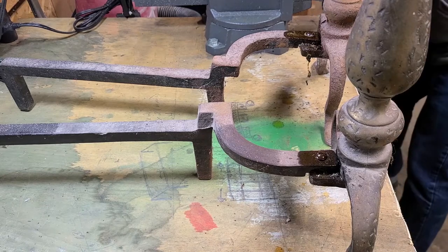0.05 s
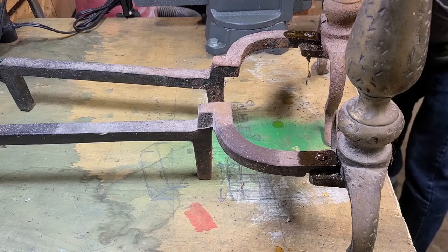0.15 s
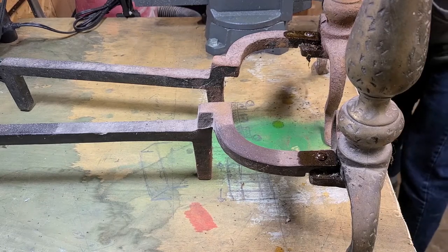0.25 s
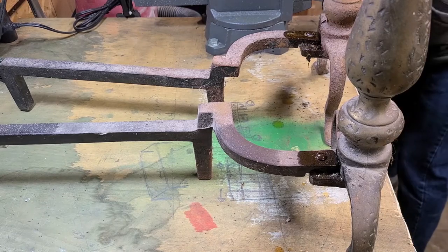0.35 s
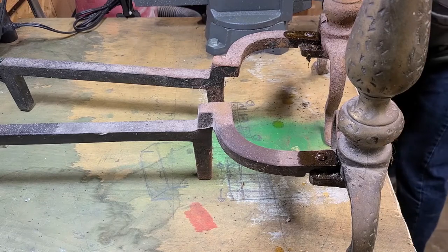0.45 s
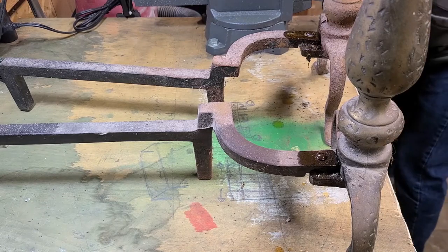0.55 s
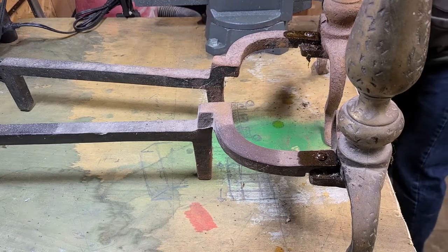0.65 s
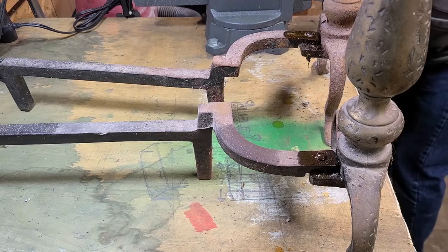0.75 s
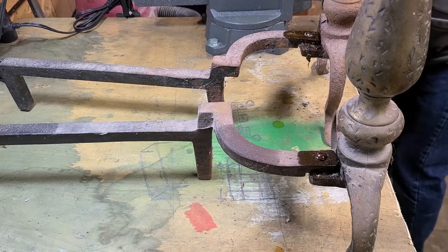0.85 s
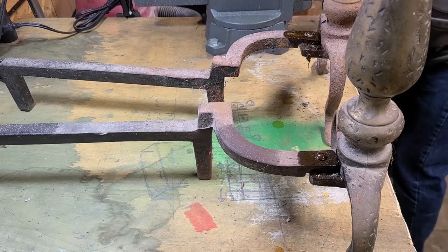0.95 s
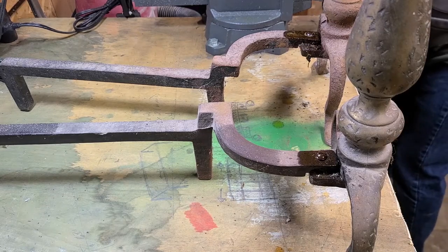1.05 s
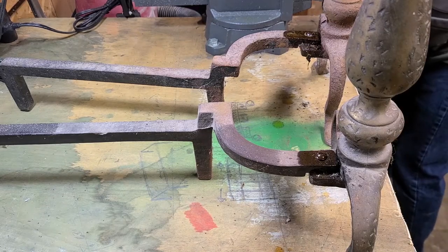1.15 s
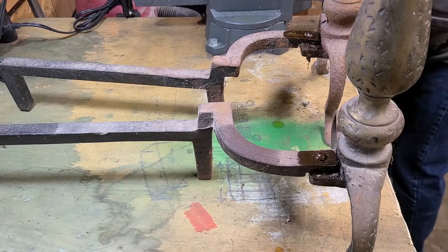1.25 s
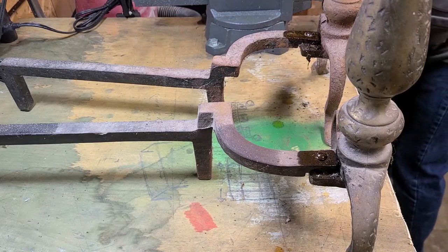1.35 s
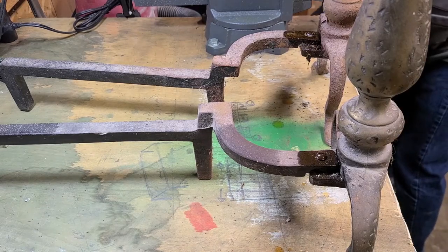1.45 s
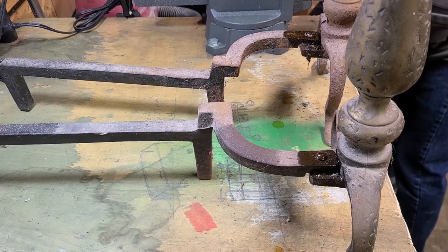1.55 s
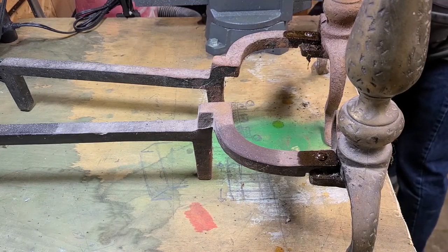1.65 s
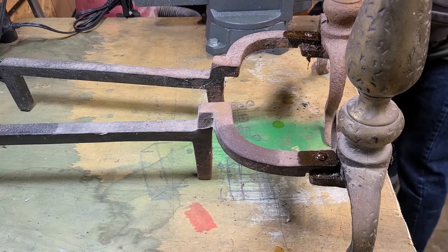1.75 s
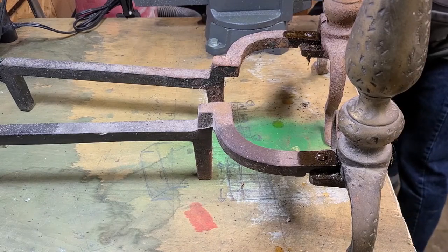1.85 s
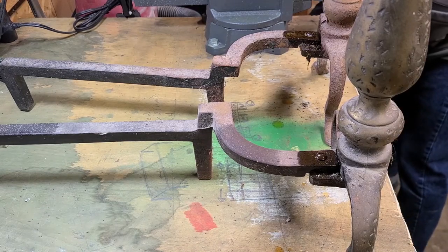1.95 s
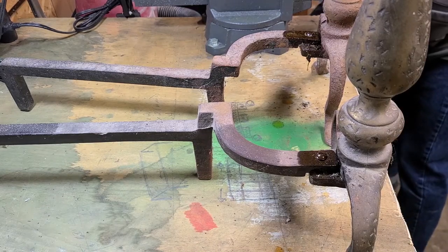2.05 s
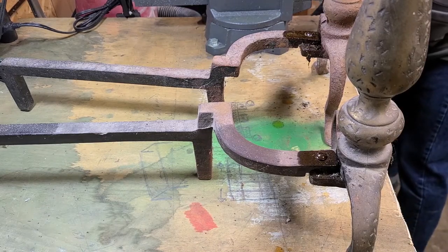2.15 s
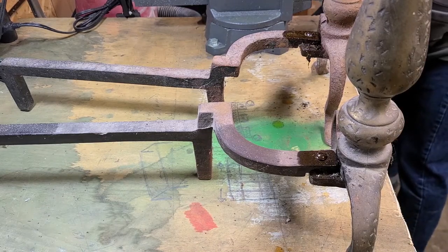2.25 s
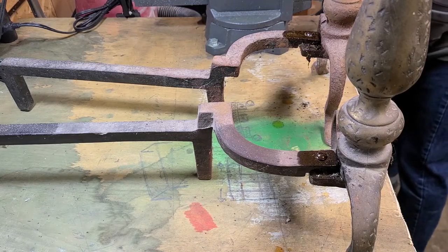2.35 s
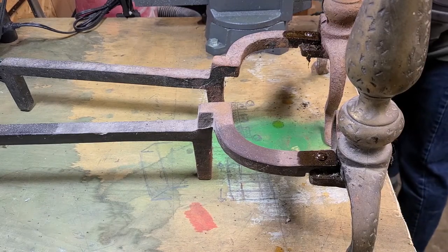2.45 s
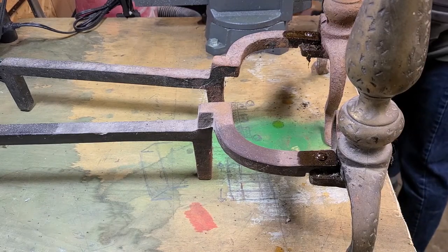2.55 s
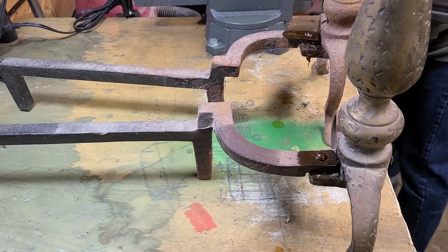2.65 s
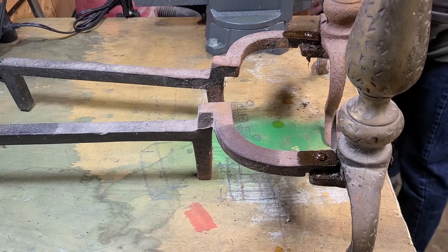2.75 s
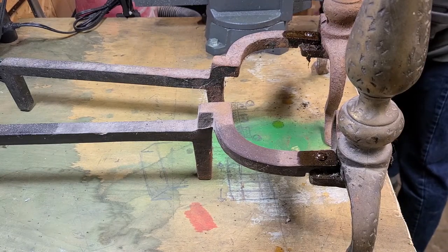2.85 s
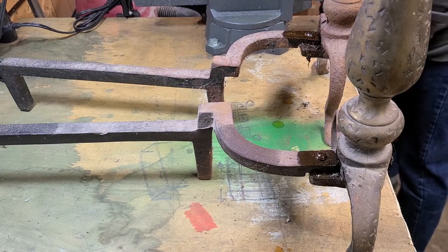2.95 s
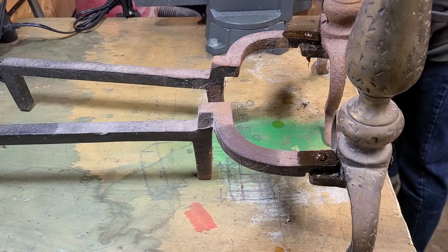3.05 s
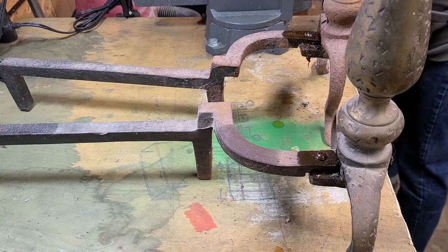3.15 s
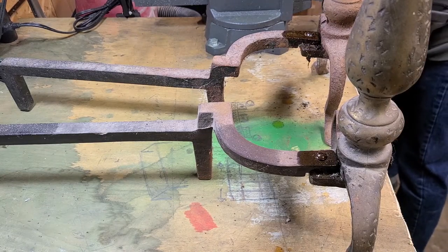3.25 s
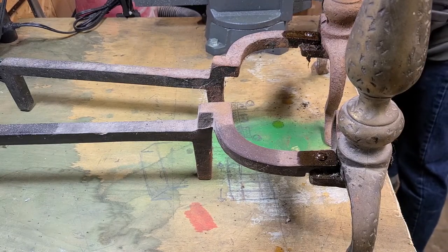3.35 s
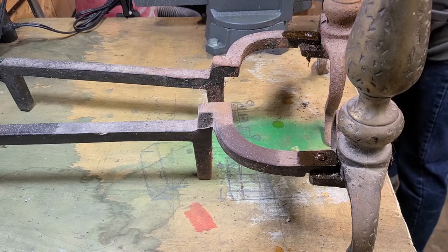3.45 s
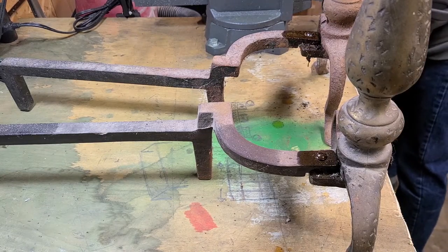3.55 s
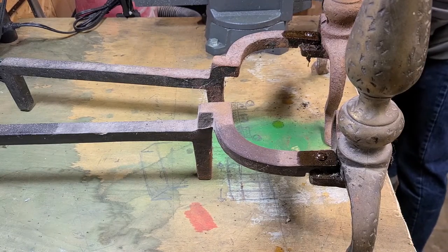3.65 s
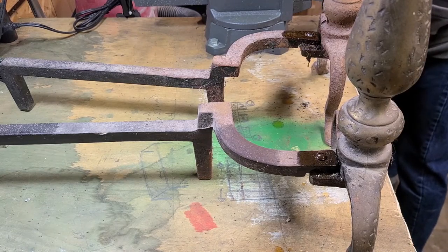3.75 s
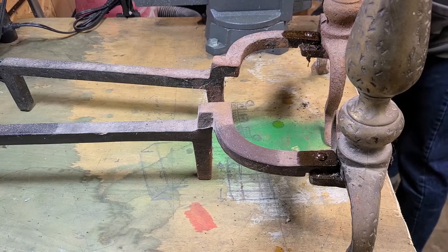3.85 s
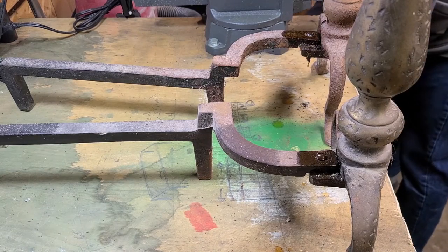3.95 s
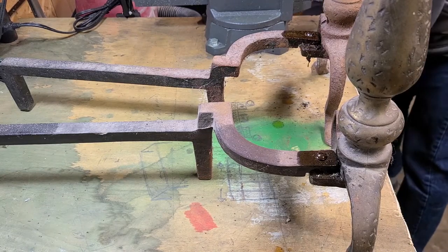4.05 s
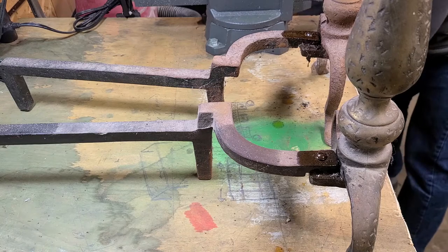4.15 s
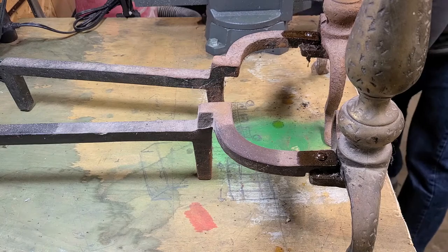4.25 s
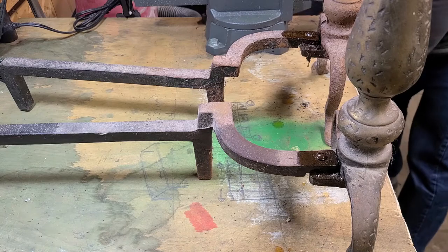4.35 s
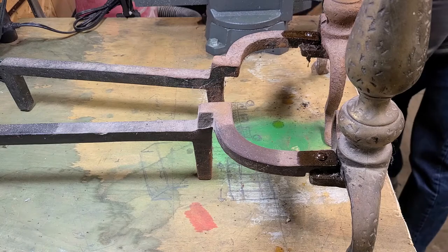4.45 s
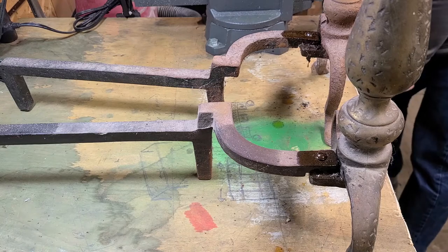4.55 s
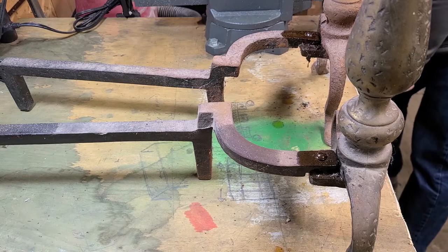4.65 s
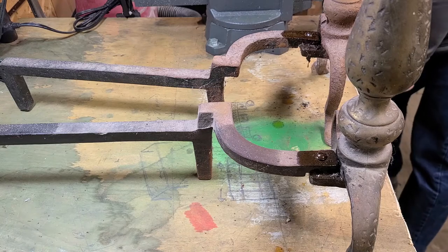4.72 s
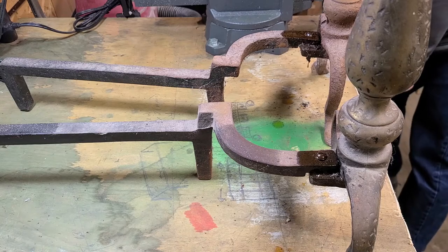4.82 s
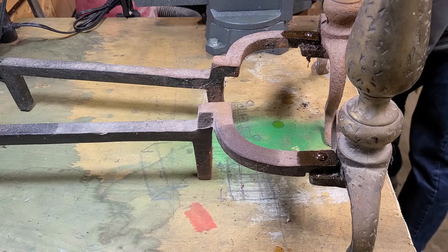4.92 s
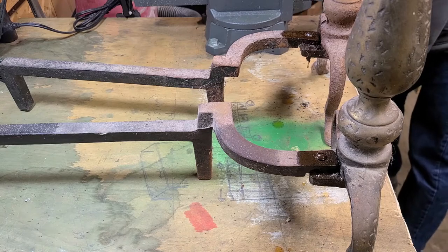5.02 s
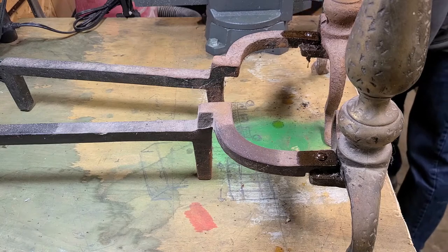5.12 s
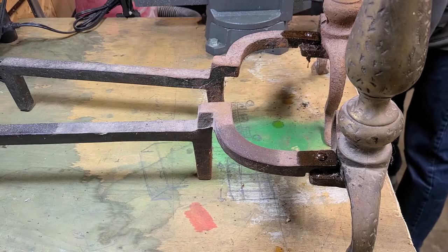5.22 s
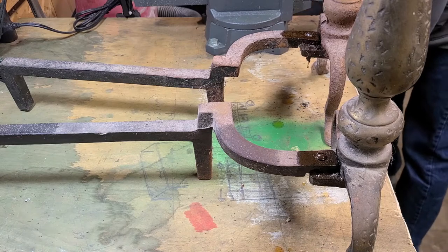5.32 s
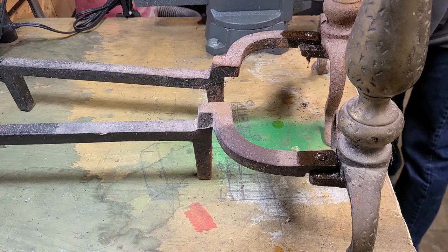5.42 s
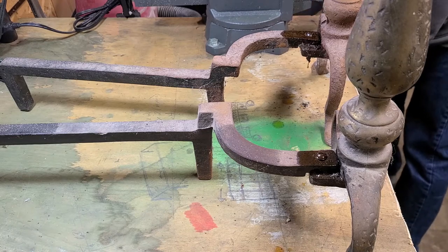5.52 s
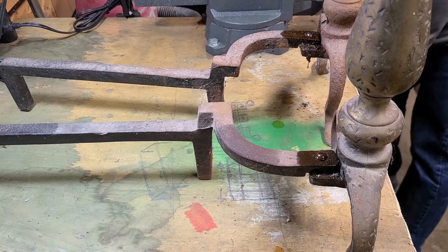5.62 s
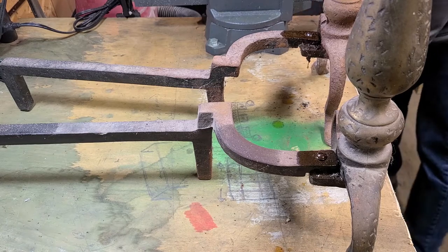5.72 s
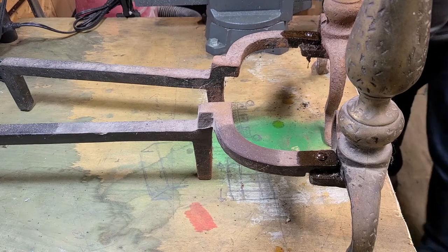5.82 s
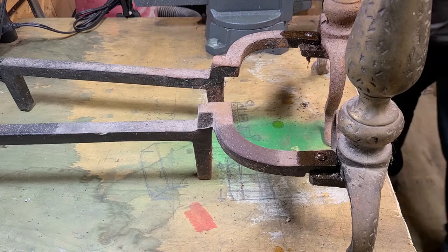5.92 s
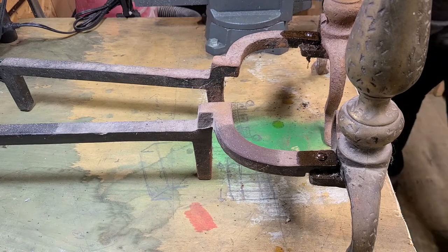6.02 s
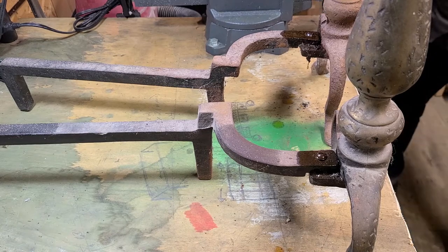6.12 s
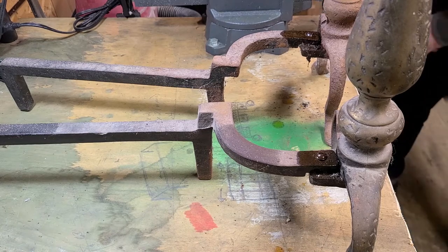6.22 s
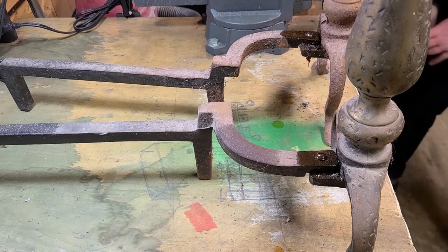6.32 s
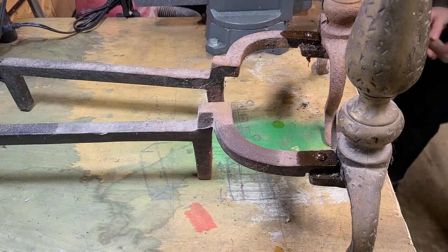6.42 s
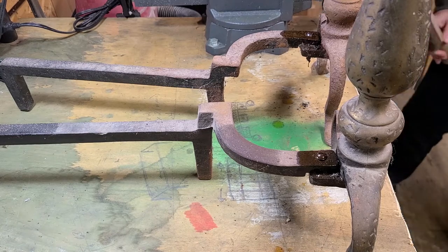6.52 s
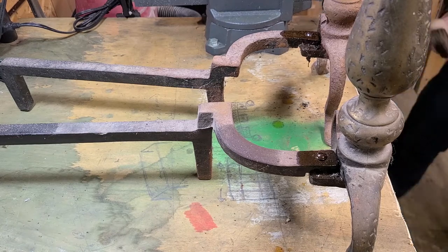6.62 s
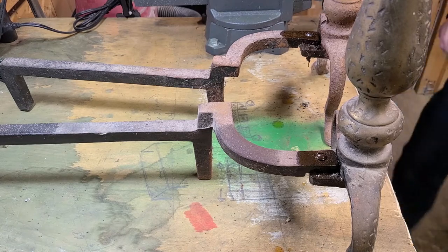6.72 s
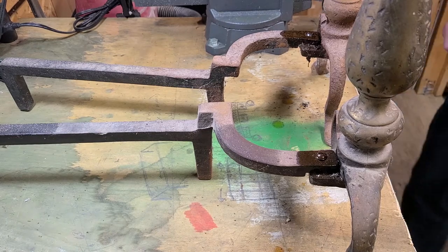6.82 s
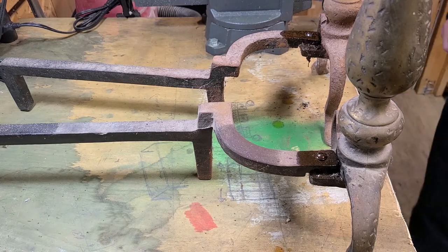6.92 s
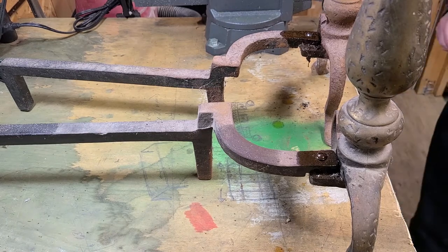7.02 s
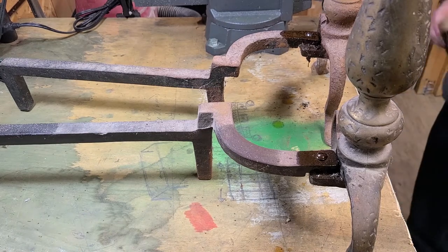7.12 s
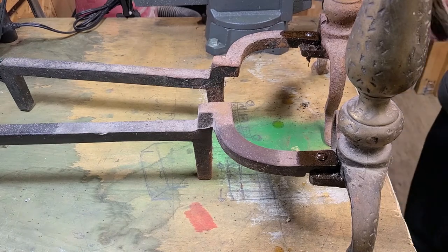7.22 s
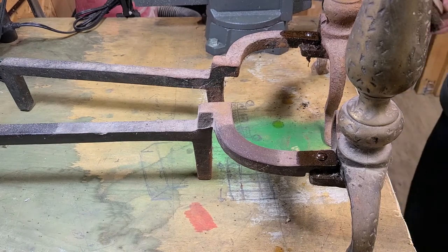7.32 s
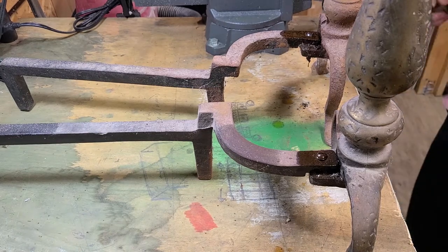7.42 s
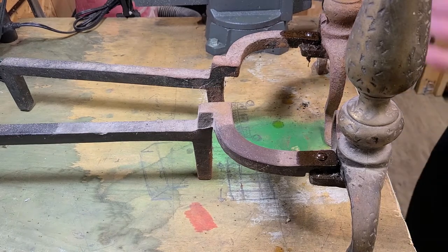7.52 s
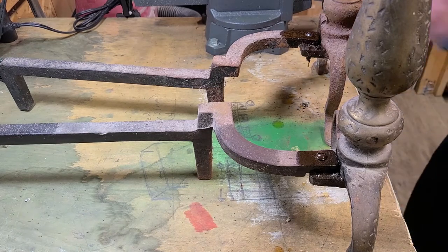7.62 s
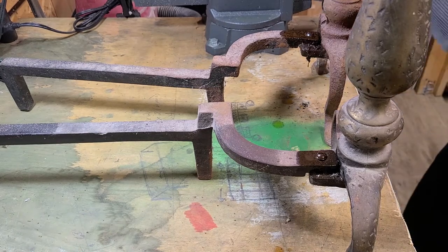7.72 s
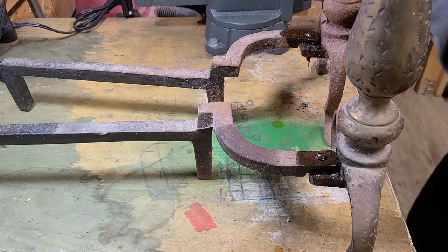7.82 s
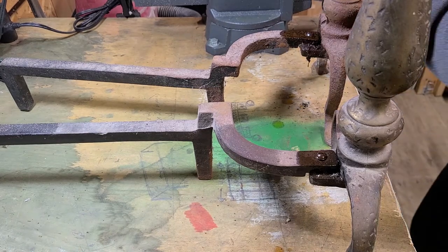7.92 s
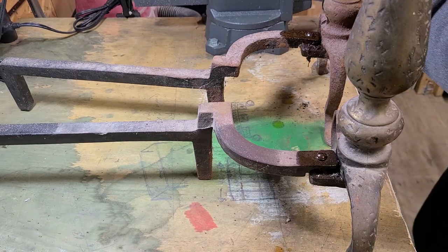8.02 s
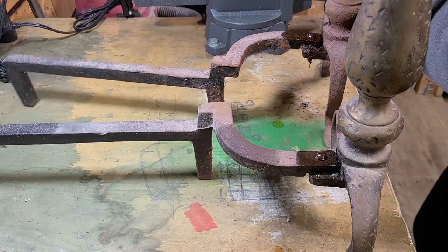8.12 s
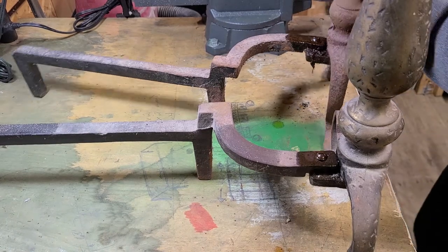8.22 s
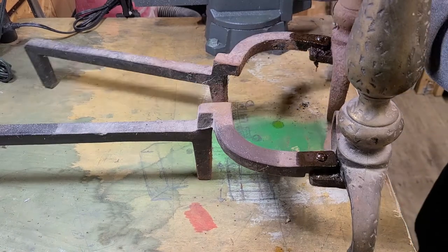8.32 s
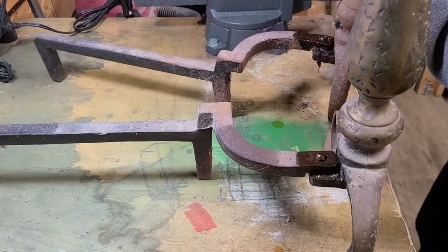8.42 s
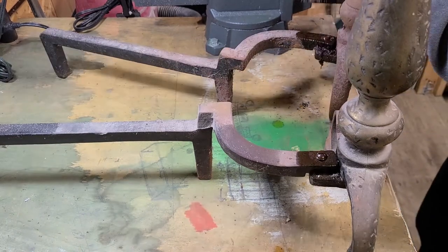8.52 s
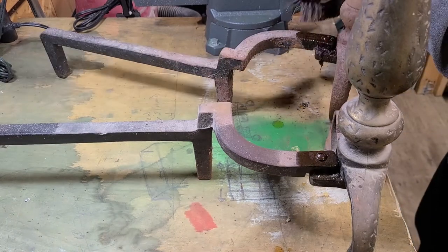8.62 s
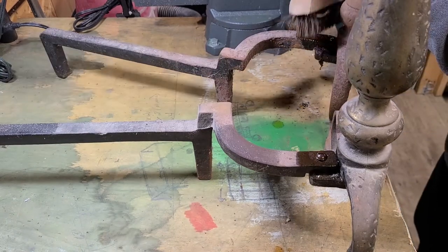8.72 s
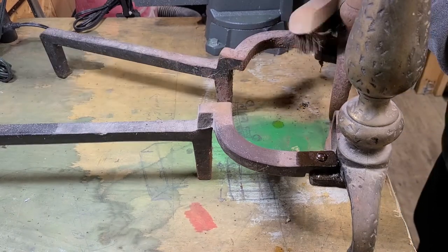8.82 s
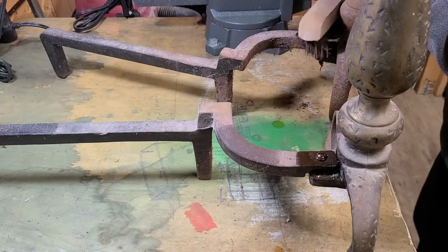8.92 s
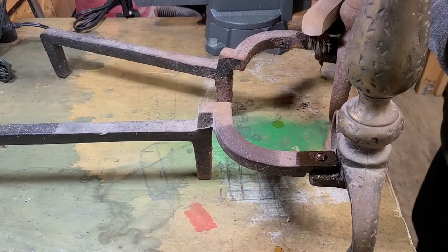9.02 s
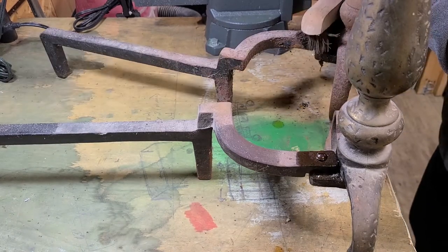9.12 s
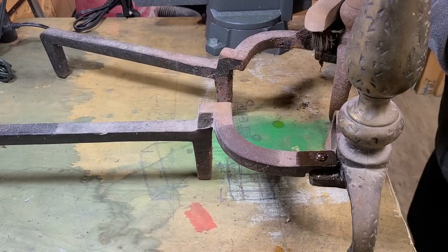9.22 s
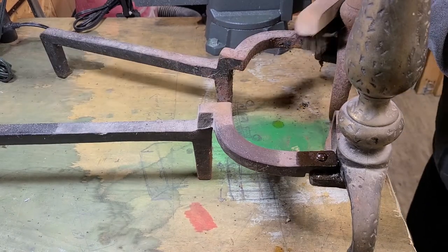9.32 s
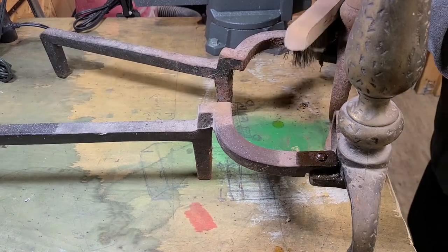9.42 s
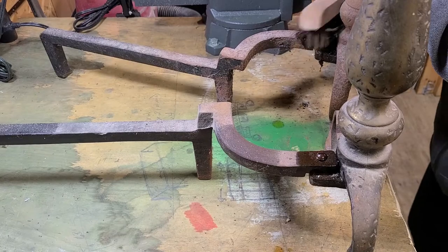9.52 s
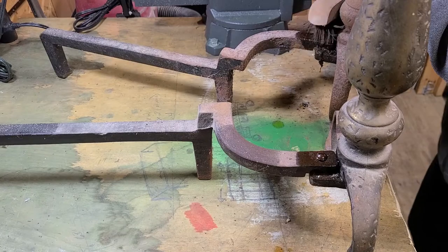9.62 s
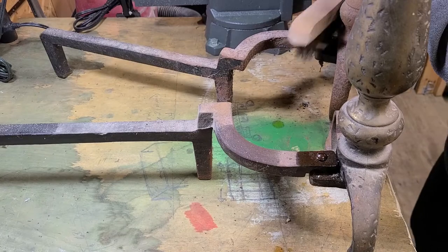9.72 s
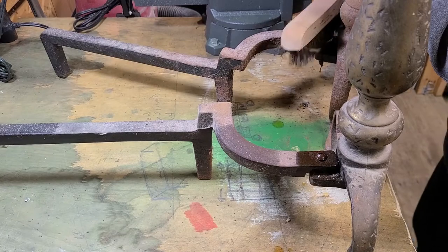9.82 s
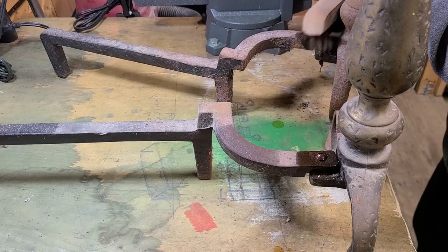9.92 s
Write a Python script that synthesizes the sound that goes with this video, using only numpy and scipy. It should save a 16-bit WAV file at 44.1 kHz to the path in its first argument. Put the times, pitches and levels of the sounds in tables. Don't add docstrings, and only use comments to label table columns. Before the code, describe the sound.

Quiet shuffling, cloth rustle and dull floor thumps, then iron feet chatter over a bench, land with a jolt, and a wire brush scratches rusty metal.

```python
import sys
import numpy as np
from scipy import signal
from scipy.fft import rfft, irfft, next_fast_len
from scipy.io import wavfile

SR = 44100
rng = np.random.default_rng(int(sys.argv[2]) if len(sys.argv) > 2 else 0)


def store_pcm(level_fs):
    pcm = np.round(np.clip(level_fs, -1, 1) * 32767).astype(np.int16)
    wavfile.write(sys.argv[1], SR, np.atleast_2d(pcm).T)


def voltage_ratio(decibels):
    exponent = np.asarray(decibels, float) / 20
    return 10 ** exponent


N = 439677


def rms_one(x):
    return x / np.sqrt(np.mean(x ** 2) + 1e-20)


def butterworth(x, order, hz, kind="low"):
    return signal.sosfilt(signal.butter(order, hz, kind, fs=SR, output="sos"), x)


def in_time(rows):
    s, *columns = np.transpose(rows)
    t = np.arange(N) / SR
    return [voltage_ratio(np.interp(t, s, column, left=-150, right=-150)) for column in columns]


def at_hz(points, hz):
    points = np.array(points)
    return np.interp(np.log(hz), np.log(points[:, 0]), points[:, 1])


def drift(rate_hz):
    step, settle = 40, 2000
    r = np.exp(-2 * np.pi * step * rate_hz / SR)
    noise = rng.standard_normal(N // step + settle + 2)
    slow = signal.lfilter([1], [1, -2 * r, r * r], noise)[settle:]
    return np.interp(np.arange(N) / step, np.arange(len(slow)), rms_one(slow))


def ring(force, hz, t60):
    r, w = voltage_ratio(-60 / (t60 * SR)), 2 * np.pi * hz / SR
    return signal.lfilter([0, np.sin(w)], [1, -2 * r * np.cos(w), r * r], force + 1e-18)


def grains(per_s, spread_db):
    sizes_db = spread_db * np.minimum(rng.exponential(1, (2, N)), 4)
    sizes = voltage_ratio(sizes_db) * rng.choice([-1, 1], (2, N))
    return rms_one(sizes * (rng.random((2, N)) < per_s / SR))


# frequency in Hz, left-right likeness from 0 to 1.
COHERENCE = [(60, 1), (200, 0.7), (600, 0.65), (2000, 0.076), (6000, 0.14), (14000, 0.23)]


def coloured(pair, spectrum, patchy_db):
    out, lowest, highest = 0, spectrum[0][0], spectrum[-1][0]
    edges = np.geomspace(lowest, highest, int(2 * np.log2(highest / lowest)) + 2)
    for k, (low, high) in enumerate(zip(edges, edges[1:])):
        mid, side = butterworth(pair, 2, [low, high], "band") * (-1) ** k
        hz = np.sqrt(low * high)
        alike = np.clip(at_hz(COHERENCE, hz), 0, 1)
        gain = voltage_ratio(at_hz(spectrum, hz) + patchy_db * drift(11.5))
        out = out + gain * (np.sqrt(1 + alike) * mid + np.sqrt(1 - alike) * side * [[1], [-1]])
    return rms_one(out)


def struck(hits, modes, vary_db):
    hits, out = np.array(hits), np.zeros(N)
    luck = rng.normal(0, vary_db, (len(hits), len(modes)))
    for k, (hz, level_db, t60) in enumerate(modes):
        clicks = np.zeros(N)
        clicks[(hits[:, 0] * SR).astype(int)] = voltage_ratio(hits[:, 1] + level_db + luck[:, k])
        out += (-1) ** k * ring(clicks, hz, t60)
    return out


def rubbed(force, peaks, shift_db):
    out = 0
    for k, (hz, width_hz, level_db) in enumerate(peaks):
        r = np.exp(-np.pi * width_hz / SR)
        poles = [1, -2 * r * np.cos(2 * np.pi * hz / SR), r * r]
        mode = signal.lfilter([1, 0, -1], poles, force * voltage_ratio(shift_db * drift(6.6)))
        out = out + (-1) ** k * voltage_ratio(level_db) * (1 - r * r) * mode
    return rms_one(out)


def swells(starts, holds, levels_db, shape):
    rise, fall, linger_db, linger_fall, idle_db = shape
    sag_db_per_s, step = 17.5, 32
    starts, holds, levels_db = starts[:, None], holds[:, None], levels_db[:, None]
    age = np.arange(0, N + step, step, dtype=np.float32) / SR - starts
    late = np.maximum(age - holds, 0)
    sag = sag_db_per_s * (np.clip(age, 0, holds) - holds / 2)
    db = levels_db + rise * np.minimum(age, 0) - sag
    power = voltage_ratio(2 * db) * (voltage_ratio(-2 * fall * late) + voltage_ratio(2 * (linger_db - linger_fall * late)))
    level = np.sqrt(power.sum(axis=0) + voltage_ratio(2 * idle_db))
    return np.interp(np.arange(N) / step, np.arange(age.shape[1]), level)


def bursts(times, levels_db, t60s):
    out, bite_s = np.zeros(N), 0.0055
    for s, db, t60 in zip(times, levels_db, t60s):
        start = int(s * SR)
        age = np.arange(N - start)[:SR // 2] / SR
        out[start:][:len(age)] += voltage_ratio(db - 60 * age / max(t60, .02)) * (1 - np.exp(-age / bite_s))
    return out


def lift(times, lead_s, depth):
    out, t = np.ones(N), np.arange(N) / SR
    for s in times:
        near = slice(max(int((s - .1) * SR), 0), int(s * SR))
        out[near] *= 1 - depth * np.exp((t[near] - s) / lead_s)
    return out


def scattered(pair, t60, echo_db, shift_hz):
    age, out = np.arange(4000) / SR, 0
    place = np.pi / 4 * (1 + np.tanh(drift(shift_hz)))
    for share in (np.cos(place), np.sin(place)):
        cloud = rng.standard_normal((2, 4000)) * voltage_ratio(-60 * age / t60)
        cloud *= voltage_ratio(echo_db) / np.linalg.norm(cloud, axis=1, keepdims=True)
        cloud[:, 0] = 1
        out = out + signal.oaconvolve(share * pair, cloud, axes=1)[:, :N]
    return out / np.sqrt(1 + voltage_ratio(2 * echo_db))


def workshop(x):
    t60, wall_cut_hz = 0.21, 2160
    size = next_fast_len(N + SR)
    bins = np.arange(size // 2 + 1)
    turn = np.exp(-2j * np.pi * bins / size)
    dull = np.exp(-2 * np.pi * wall_cut_hz / SR)
    wall = (1 - dull) / (1 - dull * turn)
    reply = np.zeros((2, len(bins)), complex)
    for k, lag in enumerate((rng.uniform(.012, 0.037, 12) * SR).astype(int)):
        loop = voltage_ratio(-60 * lag / SR / t60) * wall * np.exp(-2j * np.pi * lag / size * bins)
        reply[k % 2] += (-1) ** (k // 2) * loop / (1 - loop)
    return irfft(rfft(x, size) * reply, size)[:, :N]


def spaced(x):
    near = scattered(np.array([x, x]), t60=.04, echo_db=-7, shift_hz=3.5)
    return near + voltage_ratio(-8) * workshop(x)


# frequency in Hz, level in dB per Hz.
HUSH_SPECTRUM = [(15, -42), (25, -23), (59, 2), (87, 2), (223, -29), (403, -24.5), (673, -37),
                 (3050, -31.5), (7850, -46), (8980, -41.5), (15800, -42)]


def hush():
    return voltage_ratio(-58) * coloured(rng.standard_normal((2, N)), HUSH_SPECTRUM, patchy_db=-3.0)


# start in seconds, hold in seconds, level in dB.
LEANS = [(0.0, 0.022, -34), (0.113, 0.27, -38), (.5, .01, -36), (0.833, 0.065, -39.5), (1.027, 0.17, -50),
         (1.513, .16, -50), (1.784, 0.14, -49.5), (2.024, .01, -39.5), (2.46, 0.18, -33.5),
         (3.255, .01, -33.5), (3.378, 0.16, -44.5), (3.628, 0.11, -33.5), (3.92, 0.1, -14.5),
         (4.082, 0.056, -24.5), (4.805, 0.12, -31.5), (4.975, .01, -25.5), (5.195, .05, -28.5),
         (5.433, .01, -27.5), (5.554, 0.0082, -12), (5.63, 0.0091, -10.5), (5.745, .06, -23),
         (6.462, 0.13, -41), (6.937, 0.063, -26), (7.14, 0.02, -30), (7.47, .08, -36),
         (7.67, 0.0091, -39.5), (7.873, 0.026, -34.5), (7.973, .01, -20.5), (8.198, .03, -18),
         (8.453, 0.052, -22)]
# rise and fall in dB/s, remnant in dB, its fall in dB/s, idle stir in dB.
LEAN_SHAPE = (349.5, 215, -13, 56, -63.5)
# start in seconds, hold in seconds, push on the boards in dB,
# rocking of the bench top in dB.
SHOVES = [(8.815, 0.068, -18, -26), (8.93, 0.033, -37, -33.5), (9.152, 0.22, -42.5, -42),
          (9.333, 0.021, -20, -19), (9.45, 0.13, -33, -35.5), (9.68, 0.074, -29.5, -26),
          (9.869, 0.018, -24, -21.5)]
# rise and fall in dB/s, remnant in dB, its fall in dB/s, idle stir in dB.
SHOVE_SHAPE = (898, 302, -15.5, 51, -85.5)
# start in seconds, boom in dB,
# hollow note in Hz, note against the boom in dB.
THUDS = [(0.825, -39, 167, -25), (2.45, -30, 400, 0.5), (3.232, -38, 268.7, 12), (3.892, -14.5, 166.5, 9),
         (4, -15, 169, -0.5), (4.782, -23.5, 173, -9), (5.56, -23, 145, -23), (5.618, -13.5, 254.5, -9.5),
         (6.451, -47.5, 164, 10), (6.958, -29.5, 190, 1.5), (7.468, -38.5, 175.6, 16.5),
         (7.645, -31, 161, -1), (7.952, -19, 233.6, -8.5), (8.199, -25, 223, 7), (8.450, -17, 188.6, -3),
         (8.798, -2.5, 144, -33), (9.322, -17, 155, 2.5), (9.683, -25, 150, -4), (9.853, -22, 153.2, -2)]
# frequency in Hz, level in dB, T60 in seconds.
FLOOR_MODES = [(47.8, -15, 0.26), (67.6, -11.5, 0.26), (82, 3.5, 0.46), (106.6, -3.5, 0.5),
               (160.6, -8.5, 0.38), (223.5, -7.5, 0.064), (290.5, -17, 0.22)]


def boards():
    weight = swells(*np.transpose(LEANS), LEAN_SHAPE)
    s, hold, push_db, rock_db = np.transpose(SHOVES)
    pushing = swells(s, hold, push_db, SHOVE_SHAPE)
    rocking = swells(s, hold, rock_db, SHOVE_SHAPE)
    load = (weight + pushing) * lift(np.array(THUDS)[:, 0], lead_s=0.05, depth=1.0)

    force = grains(300, 2.0)
    hum = rms_one(sum(voltage_ratio(level_db) * ring(force[0], hz, 0.68 * t60) for hz, level_db, t60 in FLOOR_MODES))
    damped = [(hz, level_db, 0.66 * t60) for hz, level_db, t60 in FLOOR_MODES]
    blows = struck([(s, db - 16.5) for s, db, hz, rel in THUDS], damped, vary_db=1.5)
    for s, db, hz, rel in THUDS:
        heel_and_toe = [(s, db + rel - 5.5), (s + 0.0147, db + rel - 9.5)]
        blows = blows + struck(heel_and_toe, [(hz, 0, .3), (1.6 * hz, -5, .1)], vary_db=2.0)
    bench_top = rms_one(ring(force[1], 163, 0.11) + voltage_ratio(-1.0) * ring(force[1], 225, 0.054))
    sway = voltage_ratio(-24) * load * rms_one(ring(force[1], 75, .08)) * [[1], [-1]]
    floor = voltage_ratio(-3.5) * load * hum + blows + voltage_ratio(-2.0) * rocking * bench_top + sway
    return butterworth(floor, 2, 900)


# start in seconds, hold in seconds, rasp
# in dB, dull rub against rasp in dB, grit against rasp in dB.
SLIDES = [(0.054, 0.24, -53.5, 7, -20), (0.253, 0.21, -43.5, 1, -4.5), (0.509, 0.023, -41, 4, -32),
          (0.843, 0.054, -67.5, 19.5, -13), (1.037, 0.098, -69.5, 16, -3.5), (1.79, 0.065, -54.5, 6.5, -10),
          (2.02, 0.045, -52, 9, -9.5), (1.97, .04, -58, 12, -20), (2.364, 0.048, -51, 13, -10),
          (2.472, 0.11, -29, -0.5, -6.5), (1.501, 0.052, -66, 12.5, -8), (3.271, 0.0092, -43, 10, -14),
          (3.415, 0.19, -64.5, 9, -7.5), (3.574, 0.089, -48, 5.5, -12.5), (3.681, 0.16, -42, -0.5, -9),
          (3.901, 0.089, -29.5, 5, -6.5), (4.841, 0.037, -43, 8.5, -8.5), (4.79, .03, -56, 0, -4),
          (2.25, .03, -60, 0, -6), (7.35, .08, -64, 0, -4), (5.27, .04, -56, 0, 2),
          (4.975, 0.12, -55, 17, -15.5), (5.181, 0.12, -45, 8, -8), (5.407, 0.052, -55, 13, -13),
          (5.584, 0.062, -37.5, 11, -15), (6.271, 0.069, -54.5, -1, -20), (6.463, 0.077, -67.5, 20.5, -9),
          (6.963, 0.016, -39, -0.5, -11.5), (7.134, 0.033, -63, 17.5, -13),
          (7.495, .01, -50, 4, -9.5), (7.661, .01, -55, 15, -12.5), (7.81, 0.29, -68.5, -4, 0.5),
           (7.989, .01, -43, -1.5, -13.5), (8.115, .06, -34, 1, -31), (8.207, .01, -23.5, 4.5, -23.5),
           (8.287, .09, -30.5, 7, -27), (8.468, 0.0065, -38.5, 17.5, -13)]
# rise and fall in dB/s, remnant in dB, its fall in dB/s, idle stir in dB.
RUB_SHAPE = (310, 227.5, -27.5, 63.5, -69)
RASP_SHAPE = (305, 279, -36.5, 93, -72.5)
GRIT_SHAPE = (355, 336.5, -47, 71, -79)
# start in seconds, rub in dB, grit against rub in dB, T60 in seconds.
SCUFFS = [(0.243, -27.5, -31, 0.16), (0.499, -28.5, -38, 0.16), (0.827, -45, -34, 0.24),
          (1.464, -50, -18, 0.29), (2.235, -33.5, -30, 0.24), (2.359, -32.5, -31, 0.22),
          (2.463, -19, -29, 0.16), (3.225, -21.5, -22, 0.205), (3.574, -19.5, -51, 0.21),
          (3.894, -13, -21.5, 0.13), (3.948, -29.5, -1, 0.2), (3.709, -42, -3, .15),
          (4.791, -44.5, -25, 0.22), (4.989, -38, -30, .1), (5.437, -40, -30, .1), (7.222, -58, -8, .05),
          (0.366, -36, -20, .1), (5.082, -33, -49, 0.3), (6.46, -39, -16, 0.067), (6.94, -25, -20, 0.11),
          (7.467, -59, -13, 0.22), (7.636, -47, -33, 0.13), (8.201, -20, -32, 0.076),
          (8.444, -11, -19.5, 0.076)]
# frequency in Hz, level in dB per Hz.
RUB_SPECTRUM = [(100, -20), (170, 6.5), (339, -2.5), (411, 4), (750, -5.5), (980, -52.5), (1650, -120)]
RASP_SPECTRUM = [(600, -21.5), (800, -1.5), (1300, -1), (2000, -6.5), (4000, -12.5), (5500, -43)]
GRIT_SPECTRUM = [(2350, -23.5), (3600, 0), (6190, -2), (8030, -11), (15100, -9.5), (15800, -8.5)]
# start in seconds, level in dB, frequency in Hz, T60 in seconds.
SQUEAKS = [
    (1.49, -60, 5100, 0.08),
    (1.72, -65, 5200, 0.12),
    (2.875, -62.5, 7040, 0.032),
    (2.964, -49.5, 2930, 0.049),
    (4.039, -54, 2730, 0.18),
]
# frequency in Hz, width in Hz, level in dB.
CREAK_MODES = [(509, 42, 5.5), (1087, 90, -2.5), (1637, 160, -3.5)]


def soles(stillness):
    s, hold, rasp_db, dull_db, grit_db = np.transpose(SLIDES)
    rub = stillness * swells(s, hold, rasp_db + dull_db, RUB_SHAPE)
    rasp = stillness * swells(s, hold, rasp_db, RASP_SHAPE)
    grit = swells(s, hold, rasp_db + grit_db, GRIT_SHAPE)

    times, rub_db, grit_db, t60s = np.transpose(SCUFFS)
    airborne = lift(times, lead_s=0.024, depth=0.42)
    rub = rub * airborne + bursts(times, rub_db - 14.5, t60s)
    rasp = rasp * airborne + bursts(times, rub_db - 13.0, t60s)
    grit = grit * airborne + bursts(times, rub_db + grit_db + 4.5, .5 * t60s)

    slips = grains(2500, 1.9)
    body = rub * coloured(slips, RUB_SPECTRUM, patchy_db=2.5)
    scrape = rasp * coloured(slips, RASP_SPECTRUM, patchy_db=1.5)
    hiss = grit * coloured(grains(12000, 3.5), GRIT_SPECTRUM, patchy_db=3.0)
    squeak = np.zeros(N)
    for s, db, hz, t60 in SQUEAKS:
        catches = [(s, db), (s + 0.0035, db), (s + 0.031, db)]
        squeak += struck(catches, [(hz, 0, t60), (1.07 * hz, -6, t60)], vary_db=3.5)
    sliding = body + scattered(scrape + hiss + squeak, t60=0.077, echo_db=1.0, shift_hz=2.76)
    creaks = voltage_ratio(-9.5) * rasp * rubbed(slips[0], CREAK_MODES, shift_db=7.5)
    return (sliding + creaks) * voltage_ratio(1.78 * drift(29.2))


# start in seconds, hold in seconds, level in
# dB.
SWISHES = [(0.243, .03, -62), (1.47, .05, -67), (1.825, .03, -67), (2.025, .03, -60), (2.42, .03, -56),
           (2.462, .1, -44), (3.235, .02, -62), (3.712, .035, -46), (3.892, .03, -43), (3.953, .035, -40),
           (4.79, .07, -63), (5.55, .08, -64), (6.945, .03, -60), (9.47, .08, -42), (9.67, .09, -37),
           (9.87, .11, -37)]
# start in seconds, hold in seconds, level
# in dB, frequency in Hz, width in Hz.
RUSTLES = [(0.26, .14, -48, 2980, 200), (0.501, .025, -39, 1600, 1500), (1.475, .07, -60, 3100, 250),
           (1.475, .05, -65, 5070, 200), (1.715, .06, -64, 2900, 250), (1.715, .09, -69, 5350, 120),
           (1.715, .08, -71, 6000, 120), (2.236, .02, -52, 1700, 900), (2.361, .03, -44, 1900, 900),
           (2.465, .03, -34, 1450, 400), (2.465, .03, -29, 480, 300), (3.577, .03, -40, 1300, 1200),
           (3.715, .03, -52, 11000, 900), (5.081, .05, -38, 900, 300), (5.12, .03, -45, 2000, 400),
           (5.2, .05, -43, 1400, 200), (5.24, .03, -38, 900, 200), (5.29, .025, -45, 1600, 250),
           (7.469, .02, -50, 900, 700), (3.896, .04, -22, 220, 120), (9.316, .06, -41, 2210, 40),
           (9.67, .015, -38, 2800, 120), (6.27, .07, -55, 1100, 250), (7.35, .08, -64, 2800, 900),
           (7.345, .03, -58, 780, 100), (8.12, .07, -42, 1270, 90), (8.09, .1, -52, 2150, 90),
           (8.11, .08, -52, 2500, 90), (8.204, .025, -28, 1020, 300), (8.33, .06, -34, 560, 90)]
# rise and fall in dB/s, remnant in dB, its fall in dB/s, idle stir in dB.
SWISH_SHAPE = (1500, 330, -25, 90, -100)
RUSTLE_SHAPE = (2000, 400, -40, 100, -120)


def rustling():
    slips = grains(4000, 3.0)
    air = rms_one(butterworth(rng.standard_normal((2, N)), 2, 8500, "high"))
    out = swells(*np.transpose(SWISHES), SWISH_SHAPE) * air
    for s, hold, db, hz, width_hz in RUSTLES:
        near = slice(int((s - .1) * SR), int((s + .4) * SR))
        peak = signal.iirpeak(hz, hz / width_hz, fs=SR)
        rough = slips[0, near] + .6 * slips[1, near] * [[1], [-1]]
        tone = signal.lfilter(*peak, signal.lfilter(*peak, rough))
        level = swells(np.array([s]), np.array([hold]), np.array([db]), RUSTLE_SHAPE)
        out[:, near] += rms_one(tone) * level[near]
    return out


# time in seconds, level in dB.
DRAG = [
    (7.93, -69.5),
    (7.966, -37),
    (8.036, -52.5),
    (8.22, -23),
    (8.294, -41.5),
    (8.33, -31.5),
    (8.438, -50),
    (8.448, -21),
    (8.46, -40),
]
# time in seconds, peak in dB.
BUMPS = [
    (7.952, -46),
    (8.202, -11),
    (8.472, -6),
]
# frequency in Hz, width in Hz, level in dB.
FRAME_MODES = [(550, 23, 2.5), (650, 60, -4), (800, 36, -6.5), (1012, 13, -12), (1266, 19, -3),
               (1553, 15, -8.5), (2410, 26, -9.5), (3430, 210, -16)]
# frequency in Hz, level in dB, T60 in seconds.
BENCH_MODES = [(167, -15, 0.15), (313, -2.5, 0.069), (435, -15, 0.094), (484, -3, 0.1), (686, 5, 0.05),
               (804, -11, 0.19), (1020, -15, .05), (1250, -4, 0.058), (1470, -29, 0.077)]


def frame(dragging):
    chatter = dragging * rubbed(grains(1500, 4.5)[0], FRAME_MODES, shift_db=4.0)
    return voltage_ratio(-2.5) * chatter + struck([(s, db - 13) for s, db in BUMPS], BENCH_MODES, vary_db=5.0)


# time in seconds, level in dB.
FEET = [
    (8.122, -36),
    (8.209, -22),
    (8.326, -30),
    (8.444, -32),
    (8.472, -10),
    (8.479, -13),
    (8.488, -18),
    (8.497, -20),
]
# frequency in Hz, level in dB, T60 in seconds.
LOADED_MODES = [(167, -3, .1), (318, -3, .09), (440, -8, .07), (528, -4, .09), (641, -6, .08),
                (720, -5, .07), (829, -8, .08), (953, -11, .08), (1270, -16, .07), (1540, -23, .07),
                (1900, -25, .06)]


def landing():
    return struck(FEET, LOADED_MODES, vary_db=3.0)


# time in seconds, level in dB.
JOLTS = [
    (8.238, -23),
    (8.451, -11),
    (8.4635, -8),
]
# frequency in Hz, level in dB, T60 in seconds.
BENCH_LEG_MODES = [(79, 0, .32), (52, -8, .2)]


def jolt():
    return butterworth(struck(JOLTS, BENCH_LEG_MODES, vary_db=1.0), 2, 300)


# wires touch in seconds, full speed in seconds, stop in seconds,
# bristles in dB, ring of the iron in dB.
STROKES = [
    (8.72, 8.728, 8.775, -51, -56),
    (8.787, 8.802, 8.808, -33.5, -29),
    (8.848, 8.938, 9.0, -31.5, -32.5),
    (9.082, 9.131, 9.218, -34.5, -40),
    (9.301, 9.317, 9.39, -26.5, -26),
    (9.421, 9.468, 9.55, -29.5, -30.5),
    (9.642, 9.676, 9.748, -27, -27.5),
    (9.824, 9.875, 9.99, -28, -28.5),
]


def strokes():
    rows, before = [], -70
    for touch, full, stop, bristle_db, iron_db in STROKES:
        after = bristle_db - 14
        rows += [(touch, before, before), (full, bristle_db, iron_db)]
        rows += [(stop, bristle_db, iron_db - 1.0), (stop + 0.017, after + 5, after + 5)]
        before = after
    return in_time(sorted(rows))


# frequency in Hz, level in dB per Hz.
BRISTLE_SPECTRUM = [(880, -44.5), (1500, -11), (1660, -23), (2230, -2.5), (2410, -4.5), (3240, -3.5),
                    (4750, -4), (5250, -11.5), (5620, -10), (6920, -1.5), (7860, -23.5), (13900, -7),
                    (15800, -11)]
# frequency in Hz, width in Hz, level in dB.
IRON_MODES = [(465, 20.5, -5), (555, 8.4, 1.5), (728, 32, -4.5), (870, 41, -1.5), (1110, 85, -3.5),
              (1255, 52, -4), (1519, 29, -2.5), (1975, 34, -2), (2200, 17, 2), (2740, 81, 0.5),
              (3115, 110, 2), (3690, 47, -1), (5800, 22, -7), (6470, 17, -20)]
# frequency in Hz, width in Hz, depth from 0 to 1.
SHADOWS = [(937, 120, 1), (1880, 110, 0.2), (2470, 160, 0.1), (5330, 220, 0.6), (7920, 640, 0.6),
           (9620, 200, 0.6), (10700, 150, 0.4)]


def brush():
    bristles, iron = strokes()
    tips = grains(6000, 3.1)
    wires = bristles * coloured(tips, BRISTLE_SPECTRUM, patchy_db=1.5)
    scratch = scattered(wires, t60=.11, echo_db=14.0, shift_hz=2.5)
    casting = iron * rubbed(tips[0], IRON_MODES, shift_db=3.5)
    scrub = voltage_ratio(-0.8) * scratch * voltage_ratio([[.7], [-.7]]) + spaced(casting)
    for hz, width_hz, depth in SHADOWS + SHADOWS:
        scrub = scrub - depth * signal.lfilter(*signal.iirpeak(hz, hz / width_hz, fs=SR), scrub)
    return scrub


# frequency in Hz, width in Hz, level in dB.
RIB_MODES = [(2000, 25, -4), (2210, 18, 5), (2470, 30, -8), (2810, 30, -1), (3150, 30, -1), (3610, 30, -3),
             (4090, 50, -8), (4500, 40, -10), (4840, 50, -8), (5540, 30, -10), (5810, 25, -7),
             (6310, 25, -10), (7060, 45, -12), (7350, 40, -13)]


def ribs():
    return voltage_ratio(-4.5) * strokes()[0] * rubbed(grains(2500, 4.5)[0], RIB_MODES, shift_db=6.0)


# time in seconds, peak in dB.
KNOCKS = [
    (8.841, -6),
    (9.316, -30),
    (9.551, -13.5),
    (9.850, -6.5),
]
# frequency in Hz, level in dB, T60 in seconds.
KNOCKED_IRON_MODES = [(574, -15, 0.14), (650, -6.5, 0.039), (840, 1.5, 0.1), (1030, -10, 0.053), (1158, 7, 0.033),
                      (1210, -0.5, 0.044), (1482, -16, 0.11), (2036, -22, 0.041), (2260, -19, 0.056),
                      (2700, -25, .1), (3200, -5, 0.13)]


def knocks():
    bounces_s = (0, .003, .0085)
    hits = [(s + bounce, db - 11 - 450 * bounce) for s, db in KNOCKS for bounce in bounces_s]
    return butterworth(struck(hits, KNOCKED_IRON_MODES, vary_db=4.5), 4, 2100)


def scene():
    dragging = in_time(DRAG)[0]
    stillness = 1 - .7 * (dragging > 1e-5)
    walking = hush() + boards() + soles(stillness) + rustling()
    blows = spaced(frame(dragging) + knocks())
    iron = landing() + ribs()
    ringing = scattered(np.array([iron, iron]), t60=.05, echo_db=-3.0, shift_hz=2.0)
    return walking + blows + jolt() + brush() + ringing


def low_pass(x):
    return signal.sosfilt(signal.butter(12, 15980, fs=SR, output="sos"), x)


def record(dry):
    lag = 6
    ports = np.array([np.roll(dry[0], lag), dry[1]])
    ports = butterworth(ports, 4, 43.6, "high")
    mix = 1.236 * np.tanh(ports / 1.168)
    return low_pass(mix)


dry = scene()
out = record(dry)
store_pcm(out)
```